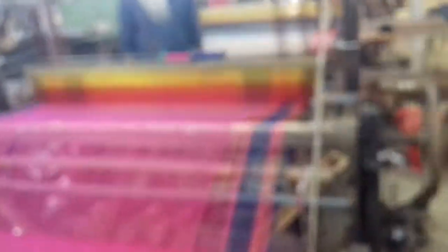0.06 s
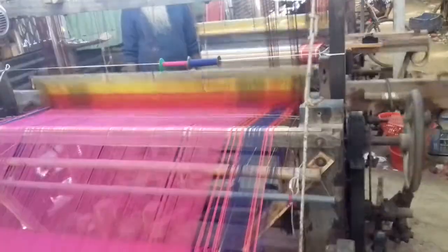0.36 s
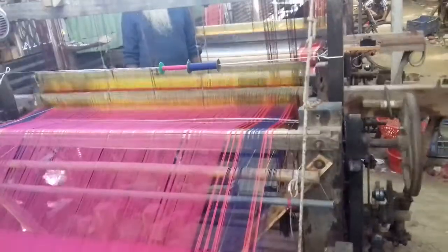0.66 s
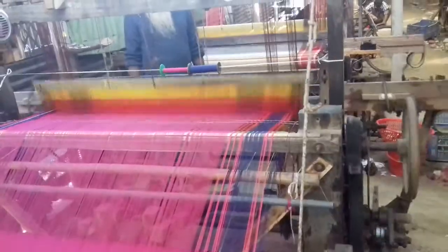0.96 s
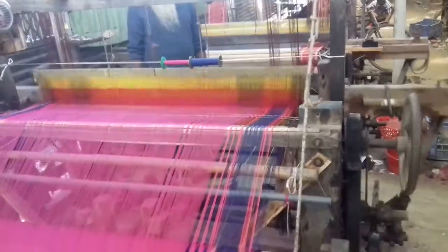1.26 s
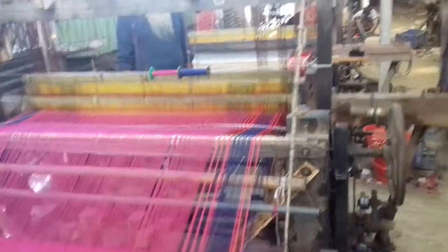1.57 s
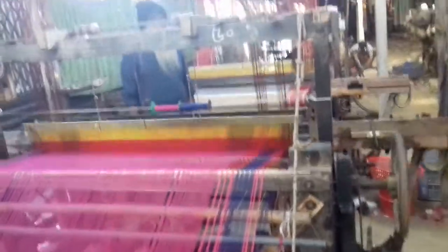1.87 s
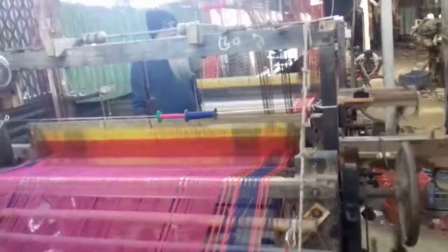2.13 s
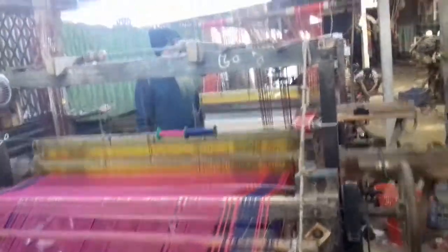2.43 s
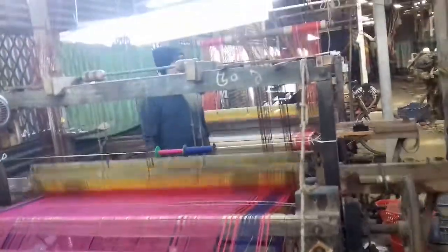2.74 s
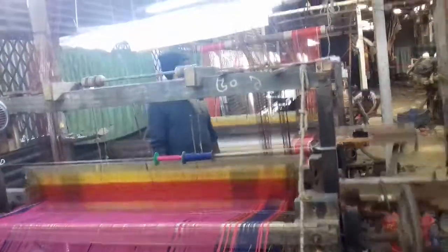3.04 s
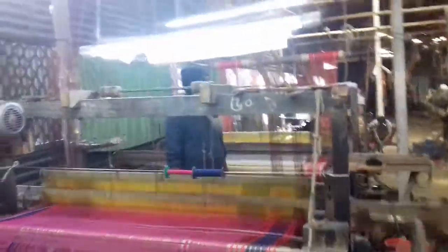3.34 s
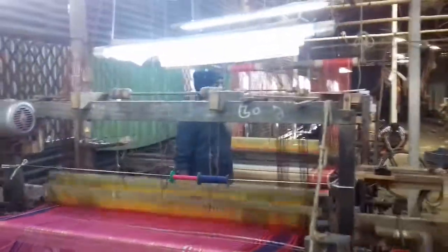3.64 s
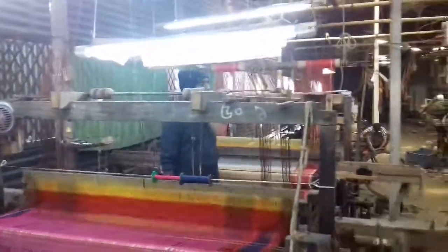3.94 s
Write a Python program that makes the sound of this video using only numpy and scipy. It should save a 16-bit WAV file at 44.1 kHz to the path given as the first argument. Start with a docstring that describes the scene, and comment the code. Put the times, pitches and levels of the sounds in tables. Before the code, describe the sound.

A shuttle loom clatters close by for the whole four seconds. From about 0.2 seconds, a bright crack comes roughly every half second, each followed 0.2 seconds later by the shuttle's rattling slam, hardest near 3.1 seconds. Wires jingle faintly between beats. Neighbouring looms knock unevenly, with a sharp clack and a small steel clink about once a second, over the weaving shed's continuous dense roar.

```python
"""In a weaving shed, close beside a shuttle loom running at about 130 picks a minute.
The heald wires jingle, then a stick whips the shuttle across with a bright crack; it brushes the brake
and slams into the far box, while a rattle swells through the slam and dies away after it.
All the while, a little further from the microphone, neighbouring looms knock and clink at their
own pace over the dense clatter of the whole shed."""
import sys
import numpy as np
from scipy import signal
from scipy.fft import rfft, irfft, next_fast_len
from scipy.io import wavfile
from scipy.ndimage import uniform_filter1d, minimum_filter1d

SR = 44100
rng = np.random.default_rng(int(sys.argv[2]) if len(sys.argv) > 2 else 0)


def to_wav(sig):
    """Store sig (one row per channel, or 1-D mono) as 16-bit WAV at the path in sys.argv[1].

    Samples outside -1..1 are clipped; the rate is SR.
    """
    pcm = np.clip(np.atleast_2d(sig), -1, 1) * 32767
    pcm = np.round(pcm).astype(np.int16)
    wavfile.write(sys.argv[1], SR, pcm.T)  # frames by channels


N = 176400
TIME = np.arange(N) / SR

# The stick throws the shuttle. Each row: start in seconds, level in dB, rattle decay in seconds.
PICKS = [(0.159, -17.5, 0.04), (0.639, -15, 0.033), (1.081, -17.5, .04), (1.558, -14.5, 0.029),
         (1.998, -19, 0.058), (2.484, -12.5, 0.025), (2.921, -16.5, 0.045), (3.409, -14, 0.036),
         (3.855, -18, 0.042)]
# It lands in the two boxes in turn. Each row: start in seconds, level in dB, rattle decay in seconds.
LANDINGS = [(0.347, -12, .015), (0.835, -17, 0.024), (1.268, -14, .017), (1.759, -16.5, 0.02),
            (2.188, -11.5, 0.032), (2.679, -15, 0.037), (3.113, -9, 0.014), (3.619, -17.5, 0.046)]
BOX_ATTACK_S, BOX_HOLD_S, KNOCK_ATTACK_S = 0.0017, 0.011, 0.00089


def from_db(db):
    """Decibels to gain."""
    return 10 ** (np.asarray(db) / 20)


def rms_one(x):
    """Scale to rms 1."""
    return x / np.sqrt(np.mean(x ** 2) + 1e-20)


def body(x, colour, size=8192):
    """Pass x through a well-damped body with the given spectrum; white input keeps its power."""
    hz, db = np.transpose(colour)
    grid = np.maximum(np.fft.rfftfreq(size, 1 / SR), 1)
    gain = from_db(np.interp(np.log(grid), np.log(hz), db))
    cepstrum = irfft(np.log(gain))
    cepstrum[1:size // 2] *= 2  # minimum phase: nothing sounds before the blow
    cepstrum[size // 2 + 1:] = 0
    response = irfft(np.exp(rfft(cepstrum)))
    return signal.fftconvolve(x, response / np.linalg.norm(response))[:N]


def resonate(x, modes):
    """Ring parallel resonances, each given as frequency in Hz, peak gain in dB, width in Hz."""
    out = np.zeros(N)
    for hz, db, width in modes:
        radius = np.exp(-np.pi * width / SR)
        gain = from_db(db) * (1 - radius ** 2) / 2
        feedback = [1, -2 * radius * np.cos(2 * np.pi * hz / SR), radius ** 2]
        out += signal.lfilter([gain, 0, -gain], feedback, x + 1e-18)
    return out


def contacts(per_s=2500):
    """Chatter of loose parts: random clicks of either sign, rms 1."""
    clicks = (rng.random(N) < per_s / SR) * rng.choice([-1, 1], N)
    return rms_one(clicks * rng.uniform(0.63, 1, N))


def blows(rows, attack_s, hold_s):
    """Joint envelope of blows, each given as start in seconds, level in dB, decay in seconds."""
    power = np.zeros(N)
    for s, db, decay_s in rows:
        age = TIME[TIME >= s][:SR // 2] - s
        release = np.exp(-np.maximum(age - attack_s - hold_s, 0) / decay_s)
        shape = np.minimum(age / attack_s, 1) * release
        start = np.searchsorted(TIME, s)
        power[start:start + len(age)] += (from_db(db) * shape) ** 2
    return np.sqrt(power)


def picking_stick():
    """Right by the microphone, the stick strikes the shuttle with a bright, rattling crack."""
    # The crack's spectrum. Each row: frequency in Hz, level in dB.
    colour = [(60, -58), (300, -29), (1000, -11.5), (2000, 4.5), (3300, 6), (4300, -0.5), (5200, -8.5),
              (6500, -15), (8000, -23), (11000, -30), (15500, -45)]
    crack = blows(PICKS, attack_s=0.00063, hold_s=0.0073)
    return body(crack * contacts(per_s=3500), colour)


def shuttle_boxes():
    """The shuttle slams into the hard box and the soft box in turn."""
    # The spectra of the two boxes. Each row: frequency in Hz, level in dB.
    hard_box = [(60, -58), (300, -30), (900, -18.5), (1400, -3.5), (1950, 1.5), (2600, -0.5), (3400, -2.5),
                (4300, -11.5), (5500, -27), (9000, -41), (15500, -63)]
    soft_box = [(60, -43), (300, -28), (1000, -13), (1900, 4), (2900, 1.5), (4300, -3), (5300, -16.5),
                (7000, -22), (9000, -33), (15500, -43)]
    out = np.zeros(N)
    for side, colour in enumerate((hard_box, soft_box)):
        slam = blows(LANDINGS[side::2], BOX_ATTACK_S, BOX_HOLD_S)
        out += body(slam * contacts(), colour)
    return out


def brush_and_rattle():
    """A short brush just before each landing; a rattle swells through the slam and dies away after it."""
    # The spectrum of both. Each row: frequency in Hz, level in dB.
    colour = [(60, -44), (300, -14.5), (1000, -6.5), (2000, 3.5), (3200, 0.5), (4300, -11), (5500, -16.5),
              (8000, -31), (11000, -37.5), (15500, -53)]
    rattle_delay_s, rattle_db, rattle_decay_s = 0.11, -21.5, 0.041
    brush_lead_s, brush_db, brush_decay_s = 0.0355, -17, 0.022
    rattles = [(s + rattle_delay_s, rattle_db, rattle_decay_s) for s, _, _ in PICKS]
    brushes = [(s - brush_lead_s, brush_db, brush_decay_s) for s, _, _ in LANDINGS]
    rattle = blows(rattles, attack_s=0.13, hold_s=0)
    brush = blows(brushes, BOX_ATTACK_S, BOX_HOLD_S)
    return body(np.hypot(rattle, brush) * contacts(), colour)


def healds():
    """The fine heald wires jingle as the warp threads part, just before each pick."""
    # The wires' spectrum. Each row: frequency in Hz, level in dB.
    colour = [(500, -27), (2500, -8), (4000, 4), (6300, 2), (8000, -9.5), (11000, -10.5), (13000, -19),
              (15500, -24)]
    lead_s, level_db, decay_s = 0.08, -36.5, 0.042
    swell = blows([(s - lead_s, level_db, decay_s) for s, _, _ in PICKS], attack_s=0.03, hold_s=0)
    return body(swell * contacts(), colour)


def neighbours():
    """The looms alongside give short rattling knocks; the next one clacks sharply once a cycle."""
    # The knocks. Each row: start in seconds, level in dB, decay in seconds.
    knocks = [(0.020, -20, 0.039), (0.269, -20, .02), (0.527, -33, .012), (0.560, -27, 0.019),
              (0.746, -15, 0.01), (0.776, -16, 0.016), (0.962, -12, 0.008), (1.513, -15, 0.023),
              (1.655, -19.5, 0.06), (1.715, -35, .02), (1.878, -21, 0.023), (1.910, -17, 0.03),
              (2.018, -16, 0.026), (2.133, -19, 0.011), (2.317, -35, 0.009), (2.408, -28, .03),
              (2.534, -14, 0.024), (2.590, -15.5, 0.069), (2.824, -16.5, 0.023), (2.876, -18, 0.017),
              (2.940, -17, 0.011), (2.972, -19.5, 0.11), (3.556, -16.5, 0.033), (3.760, -18, 0.083),
              (3.930, -22, 0.027)]
    # The clacks. Each row: start in seconds, level in dB.
    clacks = [(0.504, -17), (1.439, -12), (2.368, -10.5), (3.303, -13)]
    # Their spectra. Each row: frequency in Hz, level in dB.
    knock_colour = [(60, -55), (250, -18), (700, -16.5), (1100, -0.5), (1500, -4.5), (2100, 6),
                    (2900, -2.5), (4200, -11), (5500, -20), (9000, -37), (15500, -55)]
    clack_colour = [(60, -40), (400, -14), (1100, -9.5), (1750, -6.5), (2100, 3), (2600, -7.5), (4200, -13),
                    (5500, -36), (9000, -49), (15500, -58)]
    clack_decay_s = 0.0035
    knock = blows(knocks, KNOCK_ATTACK_S, hold_s=0.0011)
    clack = blows([(s, db, clack_decay_s) for s, db in clacks], KNOCK_ATTACK_S, hold_s=0.0036)
    return body(knock * contacts(), knock_colour) + body(clack * contacts(), clack_colour)


def iron_frames(machines):
    """The iron frames ring faintly with every blow."""
    # The frames' modes. Each row: frequency in Hz, relative peak level in dB, width in Hz.
    modes = [(1100, 1, 25), (1157, 2, 19), (1474, -3, 34), (1770, 0, 30), (1825, -2, 22), (1940, 0.5, 34),
             (2110, -7, 16), (2480, 3, 25), (2840, -5, 45), (3230, -4, 22), (4160, -3, 46)]
    return from_db(-2.5) * resonate(machines, modes)


def steel_part(touches, modes, hold_s, decay_s):
    """A small steel part chatters for a moment and rings in its modes."""
    touch = blows([(s, db, decay_s) for s, db in touches], KNOCK_ATTACK_S, hold_s)
    out = np.zeros(N)
    for hz, db, width in modes:
        ring = resonate(touch * contacts(), [(hz, db, width)])
        out += ring / np.sqrt(np.pi * width / SR)  # a mode's power does not depend on its width
    return out


def clinks_and_chinks():
    """A small steel part clinks once a cycle and a loose link chinks now and then."""
    # When each part is struck. Each row: start in seconds, level in dB.
    clinks = [(0.212, -34), (1.148, -38), (2.081, -33), (3.015, -30), (3.949, -36.5)]
    chinks = [(0.744, -43), (2.590, -35), (3.780, -44)]
    # How each part rings. Each row: frequency in Hz, relative level in dB, width in Hz.
    clink_modes = [(6440, 0.5, 96), (8550, -17, 300), (10300, -15, 400), (12900, -13, 400),
                   (14000, -18, 500), (15300, -24, 400)]
    chink_modes = [(7380, -1.5, 90), (8500, -11.5, 620), (12250, -17, 200), (14210, -14, 70)]
    return (steel_part(clinks, clink_modes, hold_s=0.005, decay_s=0.002)
            + steel_part(chinks, chink_modes, hold_s=0.013, decay_s=0.012))


def room(x, paths=12, t60_s=0.51):
    """Sound bounces between the shed's walls: parallel feedback delays."""
    size = next_fast_len(N + 2 * SR)
    omega = 2 * np.pi * np.fft.rfftfreq(size, 1 / SR)
    response = 0
    for k, lag_s in enumerate(rng.uniform(0.015, 0.06, paths)):
        loop = from_db(-60 * lag_s / t60_s) * np.exp(-1j * omega * lag_s)
        response += (-1) ** k * loop / (1 - loop)
    response /= np.sqrt(np.mean(abs(response) ** 2))
    return irfft(rfft(x, size) * response, size)[:N]


def far_looms(count=5, blows_per_s=36, decay_s=0.0074, variety_db=3):
    """Looms further down the shed: random blows, each loom with its own colour."""
    # A distant loom's spectrum. Each row: frequency in Hz, level in dB.
    typical_colour = [(200, -21.5), (600, -10.5), (1100, -2.5), (2000, 2), (3000, -4), (4200, -10),
                      (5200, -17.5), (8000, -30), (15500, -42.5)]
    out = np.zeros(N)
    for _ in range(count):
        hits = rng.random(N) < blows_per_s / SR
        power = signal.lfilter([1], [1, -np.exp(-2 / (decay_s * SR))], hits + 1e-18)
        colour = [(hz, db + variety_db * rng.uniform(-1, 1)) for hz, db in typical_colour]
        out += body(np.sqrt(power) * contacts(), colour)
    return from_db(-24.5) * rms_one(out)


def shed(treble_hz=5150, treble_depth=0.83):
    """The far looms and the roar of all the rest, swelling as they drift in and out of step."""
    # The reverberant roar's spectrum. Each row: frequency in Hz, level in dB.
    colour = [(25, -45), (36, -46), (60, -36), (100, -25.5), (118, -24.5), (138, -14.5), (165, -14.5),
              (190, -17.5), (240, -13), (310, -8.5), (400, -8), (600, -9.5), (850, -5.5), (1050, -1.5),
              (1400, -3.5), (1900, 0.5), (2700, 0), (3400, -4.5), (4200, -9.5), (5000, -21), (6300, -24.5),
              (8000, -32.5), (10000, -38.5), (12500, -39.5), (15500, -47)]
    # The swells. Each row: time in seconds, clatter in dB, treble in dB; only the swings count.
    swells = [(0.0, -13, -35.5), (0.27, -12.5, -38), (0.42, -14.5, -37.5), (0.71, -15, -39.5),
              (1.37, -15.5, -39), (2.06, -15.5, -40.5), (2.25, -16.5, -41), (2.43, -13.5, -35.5),
              (2.56, -15.5, -38), (2.99, -14.5, -36.5), (3.26, -16, -36.5), (3.69, -15.5, -41.5),
              (4.0, -15, -37)]
    din = far_looms() + from_db(-18.5) * body(rng.standard_normal(N), colour)
    clatter = signal.sosfiltfilt(signal.butter(2, treble_hz, fs=SR, output="sos"), din)
    treble = din - clatter
    s, clatter_db, treble_db = np.transpose(swells)
    clatter_gain = from_db(np.interp(TIME, s, clatter_db - clatter_db.mean()))
    treble_gain = from_db(treble_depth * np.interp(TIME, s, treble_db - treble_db.mean()))
    return clatter * clatter_gain + treble * treble_gain


def scene():
    """The near machines and their reverberation over the shed's din; the small steel is close and dry."""
    machines = picking_stick() + brush_and_rattle() + shuttle_boxes() + neighbours() + healds()
    near = machines + iron_frames(machines)
    return (near + clinks_and_chinks() + from_db(-8.5) * room(near) + shed())[None]


def record(dry, low_cut_hz=96, ceiling=0.93, limiter_s=0.003, top_hz=15700):
    """One microphone by the loom thins the bass, a fast limiter holds the peaks and the top is cut."""
    thinned = signal.sosfilt(signal.butter(2, low_cut_hz, "high", fs=SR, output="sos"), dry)
    window = int(limiter_s * SR)
    needed_gain = ceiling / np.maximum(abs(thinned), ceiling)
    gain = uniform_filter1d(minimum_filter1d(needed_gain, window), window)
    return signal.sosfilt(signal.ellip(12, 0.1, 80, top_hz, fs=SR, output="sos"), thinned * gain)


dry = scene()
out = record(dry)
to_wav(out)
```